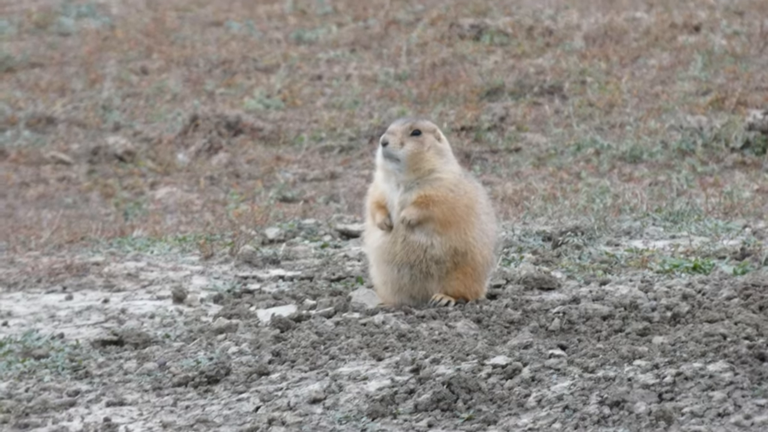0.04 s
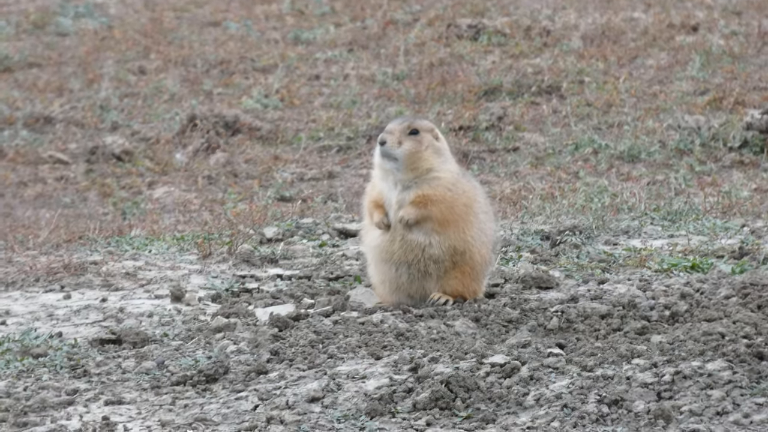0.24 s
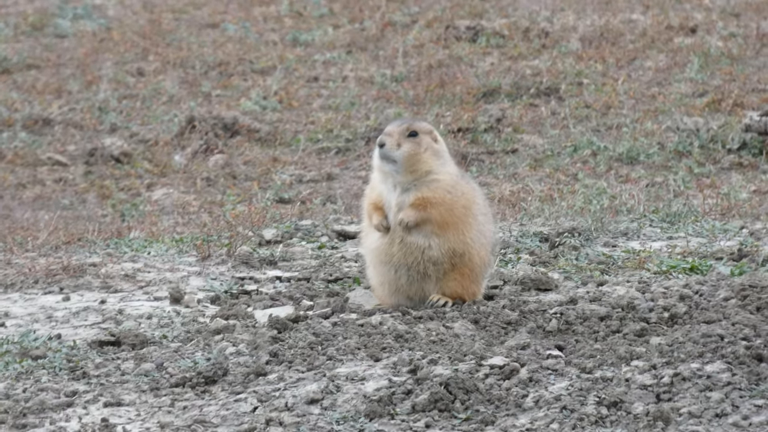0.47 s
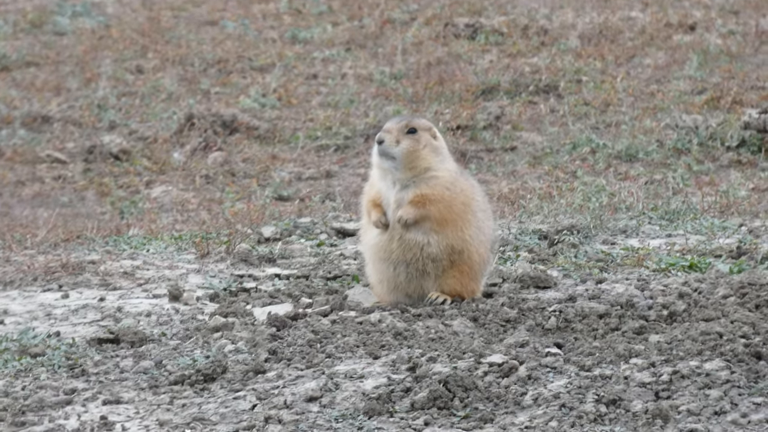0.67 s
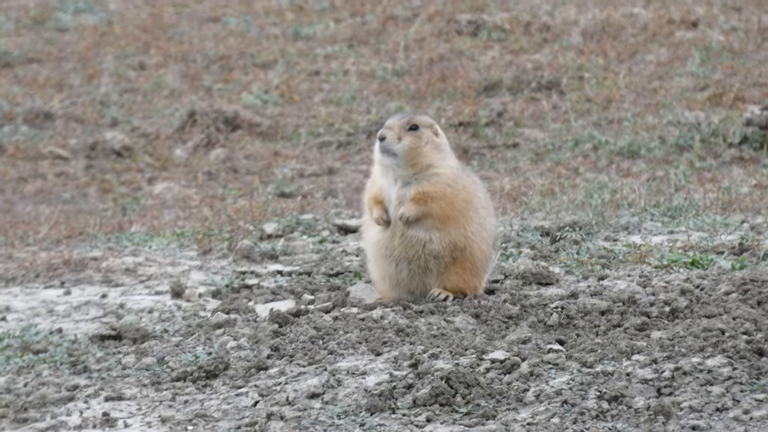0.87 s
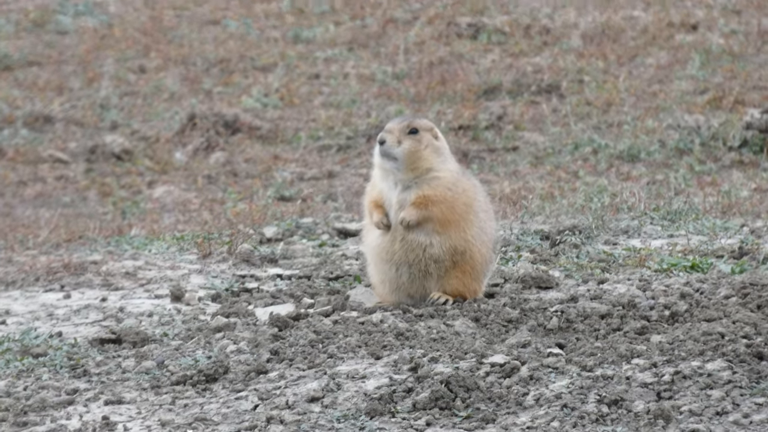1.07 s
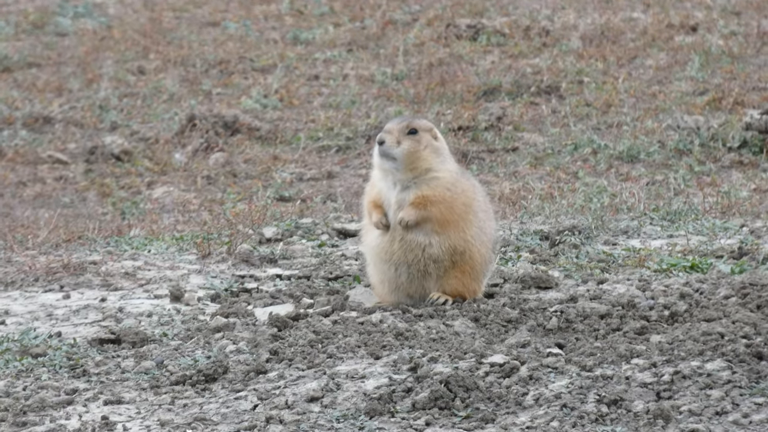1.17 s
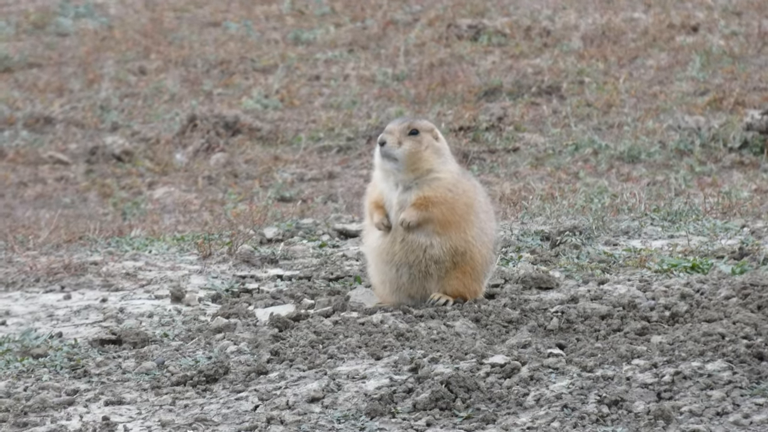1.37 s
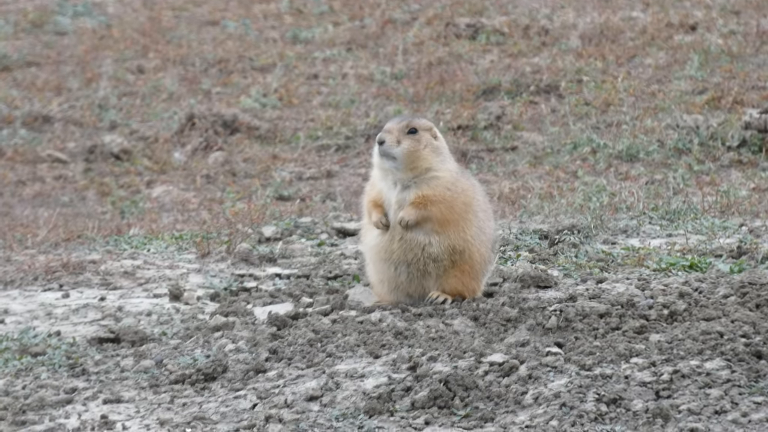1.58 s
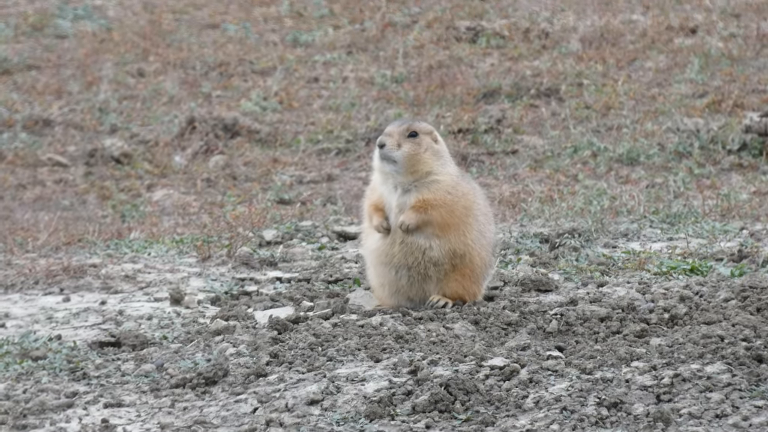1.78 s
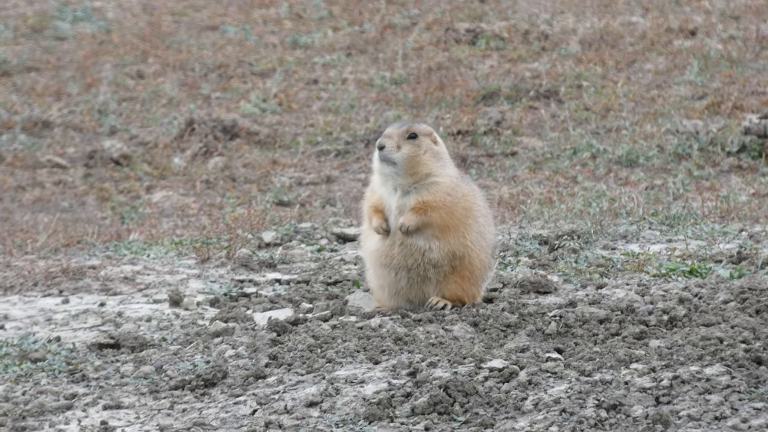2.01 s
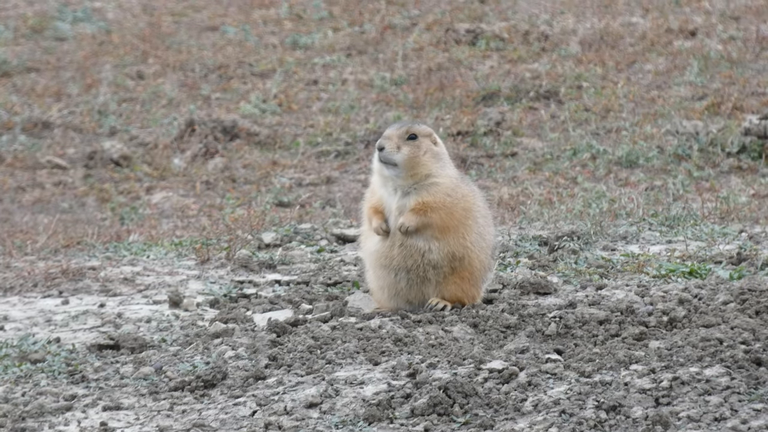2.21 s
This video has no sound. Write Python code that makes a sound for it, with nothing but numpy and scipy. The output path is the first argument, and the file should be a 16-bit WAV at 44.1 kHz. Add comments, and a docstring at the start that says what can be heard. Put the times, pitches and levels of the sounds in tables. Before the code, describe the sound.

A prairie dog gives three short, shrill, raspy barks nearby while wind rumbles on the microphone

```python
"""Open grassland, with gusts rumbling and flapping on the microphone throughout over faint still air.
A prairie dog nearby, a little to the left, gives three short, shrill barks; a faint dry tick follows
the first. Others bark faintly from far off, one before each of the later barks and one after the last.
The barks are sums of harmonics on an arching pitch, buzzing, then clearing as it falls, with rasp noise;
the wind is shaped noise under gust levels, with quick eddies and sharp buffets."""
import sys
import numpy as np
from scipy import signal
from scipy.fft import rfft, irfft
from scipy.io import wavfile

SR = 44100
rng = np.random.default_rng(int(sys.argv[2]) if len(sys.argv) > 2 else 0)


def wrap_up_sound(samples):
    """Save the sound to the file named by the first command line argument, as 16-bit audio."""
    columns = np.atleast_2d(samples).T
    # keep every value between -1 and 1, then stretch to whole-number steps
    tamed = np.clip(columns, -1, 1)
    steps = np.round(tamed * 32767).astype(np.int16)
    wavfile.write(sys.argv[1], SR, steps)


N = 99225
T = np.arange(N) / SR

# strength of each harmonic at the vocal folds, fundamental first: strength_db [dB]
FOLD_HARMONICS = [2, 6.5, -4, -12, -19, -31, -41.5]


def amp(db):
    """Decibels to gain."""
    return 10 ** (np.asarray(db) / 20)


def evened(x):
    """Scales to unit power."""
    return x / np.sqrt(np.mean(x ** 2) + 1e-20)


def colour(x, points):
    """Filters by a (Hz, dB) curve, joined on a logarithmic frequency scale."""
    size = x.shape[-1]
    hz, db = np.transpose(points)
    f = np.fft.rfftfreq(size, 1 / SR)
    gain = amp(np.interp(np.log(f + 1), np.log(hz), db))
    return irfft(rfft(x) * gain, size)


def wander(size, rate_hz):
    """Smooth random drift, of unit power over the whole scene, fading out above about a rate."""
    f = np.fft.rfftfreq(N, 1 / SR)
    slowed = rfft(rng.standard_normal(N)) * np.exp(-(f / rate_hz) ** 2)
    return evened(irfft(slowed, N))[:size]


def add(mix, start_s, sound):
    """Mixes a sound in at a time."""
    part = mix[max(round(start_s * SR), 0):][:len(sound)]
    part += sound[:len(part)]


def burst(centre_s, level_db, half_s):
    """A short bell-shaped swell; half_s is its standard deviation."""
    return amp(level_db) * np.exp(-.5 * ((T - centre_s) / half_s) ** 2)


def turbulence(spectrum):
    """Wind noise for the two channels: mostly shared in the bass, more opposed in the middle range."""
    # left-right difference against the sum: frequency_hz [Hz], difference_db [dB]
    width = [(30, -7.5), (90, -9.5), (180, -6.5), (350, -2.5), (700, 5), (1400, 6), (2500, 4), (4000, -2),
             (12000, -5)]
    # left channel over right, a lean to the left where positive: frequency_hz [Hz], lean_db [dB]
    lean = [(60, -.3), (170, .5), (350, 1.8), (700, 1.2), (3000, 1)]
    mid, side = evened(colour(rng.standard_normal((2, N)), spectrum))
    side = colour(side, width)
    left = colour(mid + side, [(hz, db / 2) for hz, db in lean])
    right = colour(mid - side, [(hz, -db / 2) for hz, db in lean])
    return np.array([left, right])


def wind():
    """Gusts drive a deep thrum, a rumble and a brighter flapping, broken up by eddies and buffets."""
    # gust levels before the trims below: time_s [s], thrum_db [dB], rumble_db [dB], flap_db [dB]
    gusts = [(0.006, -31.5, -45, -45), (0.03, -54, -42.5, -65), (0.055, -29.5, -28.5, -47.5),
             (0.114, -35, -37, -54.5), (0.186, -37.5, -36.5, -57), (0.233, -21, -25.5, -50),
             (0.276, -35.5, -24, -45), (0.357, -28, -21, -34), (0.474, -40.5, -33.5, -48.5),
             (0.508, -37, -26.5, -44), (0.616, -30, -28, -44), (0.631, -43.5, -45.5, -70),
             (0.647, -19, -33.5, -38.5), (0.66, -33.5, -35.5, -58), (0.729, -24, -21.5, -23.5),
             (0.773, -25, -36.5, -41), (0.791, -49, -26, -39), (0.812, -37, -44, -63.5),
             (0.833, -29.5, -30.5, -41), (0.844, -44, -33, -53), (0.955, -32.5, -30.5, -48),
             (0.985, -35, -23, -35.5), (1.002, -33.5, -27.5, -45), (1.027, -51, -11.5, -36),
             (1.043, -29, -29.5, -34.5), (1.061, -21, -19, -21), (1.086, -38.5, -33, -36.5),
             (1.114, -26.5, -25, -44), (1.13, -55, -31.5, -51.5), (1.161, -37, -22, -28.5),
             (1.223, -43.5, -41.5, -59.0), (1.252, -26.5, -27.5, -42), (1.299, -36, -33.5, -45.5),
             (1.319, -25, -23, -28.5), (1.407, -51.5, -17.5, -30.5), (1.412, -55, -34, -40),
             (1.454, -43, -27.5, -52.5), (1.464, -35, -16.5, -33.5), (1.486, -36.5, -34, -48),
             (1.52, -27, -17.5, -37.5), (1.571, -40, -40, -54.5), (1.588, -43, -32.5, -49),
             (1.673, -37.5, -34.5, -55), (1.744, -57.5, -65, -75), (1.768, -36.5, -41.5, -84),
             (1.81, -40, -49, -57.5), (1.856, -33.5, -25.5, -31.5), (1.884, -27, -18.5, -27.5),
             (1.9, -37, -31.5, -32), (1.918, -31, -19, -27), (1.996, -31.5, -27.5, -39.5),
             (2.008, -42, -34.5, -60), (2.07, -49, -47, -63), (2.16, -38, -40.5, -58),
             (2.179, -55, -59, -67), (2.213, -33.5, -41.5, -52), (2.234, -40, -36.5, -58)]
    # relative noise spectra of the three layers: frequency_hz [Hz], density_db [dB per Hz]
    thrum_spectrum = [(20, -42.5), (35, -30.5), (50, -11.5), (75, 0), (115, 5), (150, 5), (220, -31.5),
                      (500, -71.5)]
    rumble_spectrum = [(30, -38.5), (100, -24), (150, 0), (230, 4.5), (320, -1.5), (450, -9), (650, -21.5),
                       (1000, -37.5), (3000, -90.5)]
    flap_spectrum = [(100, -13.5), (300, 11), (600, 4), (900, -6), (1300, -13.5), (2000, -25), (3000, -37),
                     (5000, -44.5), (9000, -62.5), (15000, -73)]
    # sharp buffets: centre_s [s], level_db [dB], half_s [s, half length of the swell]
    buffets = [(0.156, -47, .0008), (0.231, -43.5, 0.00067), (0.299, -36, 0.0039), (0.328, -48, 0.0015),
               (.358, -33, 0.0018), (0.371, -28, 0.0031), (.401, -32.5, 0.0045), (0.528, -42.5, 0.0027),
               (0.575, -46, .0018), (.605, -44, 0.002), (0.736, -24.5, 0.002), (.79, -41.5, 0.0024),
               (0.841, -52.5, 0.0025), (1.023, -35, 0.0025), (1.0627, -24.5, 0.00018),
               (1.161, -33, 0.00046), (1.247, -37, .0015), (1.339, -38, 0.0018), (1.385, -26.5, 0.002),
               (1.397, -32, 0.0017), (1.465, -42, 0.0014), (1.509, -37, 0.0045), (1.852, -26, 0.0011),
               (1.865, -25.5, 0.0015), (1.927, -25, 0.0024), (1.979, -31.5, .0009)]
    thrum_trim_db, rumble_trim_db, flap_trim_db = -2, -3.5, -0.5
    eddy_rate_hz, rumble_eddy_db, flap_eddy_db = 101, 2, 5.5

    gust_s, *levels = np.transpose(gusts)
    thrum_db, rumble_db, flap_db = (np.interp(T, gust_s, db) for db in levels)
    eddies = 2 * np.tanh(wander(N, eddy_rate_hz) / 2)  # extremes rounded off
    rumble_eddies = evened(amp(rumble_eddy_db * eddies))
    flap_eddies = evened(amp(flap_eddy_db * eddies))
    out = turbulence(thrum_spectrum) * amp(thrum_db + thrum_trim_db)
    out += turbulence(rumble_spectrum) * amp(rumble_db + rumble_trim_db) * rumble_eddies
    out += turbulence(flap_spectrum) * amp(flap_db + flap_trim_db) * flap_eddies
    return out + sum(buffet(*row) for row in buffets)


def buffet(centre_s, level_db, half_s, plain_s=.0018, crack_db=5):
    """One eddy slaps the ports: a thump, or a brighter crack when it is very short."""
    # relative noise spectrum of a slap: frequency_hz [Hz], density_db [dB per Hz]
    slap_spectrum = [(100, 2), (400, 13.5), (1100, 17), (2200, -0.5), (3200, -13), (5500, -35),
                     (15000, -55.5)]
    swell = burst(centre_s, level_db, half_s)
    # each halving below plain_s lifts the treble by crack_db; longer ones are duller
    treble_db = crack_db * np.log2(plain_s / half_s)
    slap = colour(turbulence(slap_spectrum) * swell, [(900, 0.017), (3000, treble_db)])
    return evened(slap) * np.sqrt(np.mean(swell ** 2))


def still_air(level_db=-73):
    """Steady faint hiss over the grass: noise half shared by the channels, half separate."""
    # relative spectrum of the air: frequency_hz [Hz], density_db [dB per Hz]
    air_spectrum = [(100, 10), (1000, 3.5), (2000, -1), (4000, -6), (7000, -13.5), (10000, -15),
                    (15000, -19.5)]
    air = evened(colour(rng.standard_normal((3, N)), air_spectrum))
    return amp(level_db) * (air[:2] + air[2]) / np.sqrt(2)


def gesture(length_s, top_hz, crest, scoop, sag):
    """Time, pitch arch and loudness of one bark: pitch climbs to a crest, then sags."""
    attack_s, release_s, swell_db = .007, .007, 1
    t = np.arange(0, length_s, 1 / SR)
    u = t / length_s
    rise = np.maximum(1 - u / crest, 0)
    fall = np.maximum(u - crest, 0) / (1 - crest)
    hz = top_hz * (1 - scoop * rise ** 1.9 - sag * fall ** 1.15)
    edges = np.minimum(t / attack_s, 1) * np.minimum((length_s - t) / release_s, 1)
    return t, hz, edges * amp(swell_db * (u - 2.5))


def bark(start_s, length_s, top_hz, level_db, crest, scoop, sag, flutter, rasp_db, overtones_db, grit,
         *changes):
    """Folds vibrate with a fast flutter and rasp, settle into a clearer falling tone, fray at the end."""
    # colour of the throat and mouth: frequency_hz [Hz], gain_db [dB]
    throat = [(1000, -38.5), (1800, -5.5), (2600, 2.5), (3300, 1), (3780, 4), (4300, -8), (5100, 4.5),
              (6000, -12.5), (6800, 8.5), (7500, -9.5), (10200, -0.5), (11200, -5.5), (13000, 1.5),
              (15000, -16.5)]
    # relative spectrum of the breathy rasp: frequency_hz [Hz], density_db [dB per Hz]
    rasp_spectrum = [(600, -41), (2000, -23), (2700, -9.5), (3700, 4), (4400, -2), (5300, 3.5), (6100, -8),
                     (7700, -10.5), (8500, -15), (9500, -6.5), (10800, -27), (13000, -35), (14000, -54.5)]
    # a second vibration of the folds: rate, pitch swing and unsteadiness of the rate (shares)
    flutter_hz, flutter_swing, flutter_wander = 335, .055, .1
    # time scale of a change [s], roughness left once clear (share), loudness change on fraying [dB]
    change_s, clear_left, fray_db = .002, .3, -7
    jitter, shimmer_db = .005, 1.34  # unsteadiness of pitch (share) and of loudness

    t, hz, loud = gesture(length_s, top_hz, crest, scoop, sag)
    size = len(t)
    broken, cleared, frayed = (.5 + .5 * np.tanh((t - share * length_s) / change_s) for share in changes)
    loud = loud * amp(fray_db * frayed)
    rough = clear_left + (1 - clear_left) * (broken - cleared + frayed)

    beat_hz = flutter_hz * (1 + flutter_wander * wander(size, 87))
    beat = np.cos(2 * np.pi * np.cumsum(beat_hz) / SR)
    unsteady = jitter * wander(size, 300) + grit * rough * wander(size, 1200)
    hz = hz * (1 + unsteady + flutter_swing * flutter * rough * beat)
    phase = 2 * np.pi * np.cumsum(hz) / SR

    # overtones_db lifts the third harmonic and all above
    folds = evened(sum(amp(db + overtones_db * (k > 1)) * np.cos((k + 1) * phase)
                       for k, db in enumerate(FOLD_HARMONICS)))
    shimmer = amp(shimmer_db * wander(size, 320))
    voice = colour(loud * folds * (1 + flutter * rough * beat) * shimmer, throat)
    breath = evened(colour(rng.standard_normal(N), rasp_spectrum))[:size]
    rasp = breath * amp(rasp_db) * np.sqrt(abs(rough)) * loud
    return start_s, amp(level_db) * (voice + rasp)


def ground(x):
    """A brief, faint scatter off the earth, different in each channel: decaying noise as an echo."""
    level_db, decay_s = -19, .07  # decay_s is the time to fall 60 dB
    t = T[:SR // 2]
    tail = rng.standard_normal((2, len(t))) * amp(-60 * t / decay_s) * np.minimum(t / 0.0013, 1)
    tail = tail / np.linalg.norm(tail[0])
    return amp(level_db) * signal.fftconvolve(x[None], tail, axes=1)[:, :N]


def tick():
    """A faint dry tick just after the first bark: a very short swell of coloured noise."""
    # the tick before the voice trim: centre_s [s], level_db [dB], half_s [s, half length]
    swell = (.737, -55, .0017)
    # colour of the tick: frequency_hz [Hz], gain_db [dB]
    tick_colour = [(1500, -16), (3500, 1), (7000, -3.5), (9500, -11.5), (11000, -15), (15000, -20)]
    return burst(*swell) * evened(colour(rng.standard_normal(N), tick_colour))


def far_bark(start_s, length_s, top_hz, level_db):
    """A pitch arch of the same kind from a far neighbour: equal harmonics, coloured by distance."""
    # colour of a distant bark: frequency_hz [Hz], gain_db [dB]
    far_colour = [(1400, -12), (2750, -7), (4100, 0), (5500, -12), (6900, -9), (8300, -26), (11000, -40)]
    t, hz, loud = gesture(length_s, top_hz, crest=.33, scoop=.06, sag=.125)
    hz = hz * (1 + .03 * wander(len(t), 700))
    phase = 2 * np.pi * np.cumsum(hz) / SR
    folds = sum(np.cos((k + 1) * phase) for k in range(len(FOLD_HARMONICS)))
    return start_s, amp(level_db) * evened(colour(loud * folds, far_colour))


def scene(voice_db=-2.5, lean_db=1.5):
    """The animals and the tick, a little to the left, under wind and still air."""
    # near barks before the voice trim: start_s [s], length_s [s], top_hz [Hz], level_db [dB],
    # crest [place of the pitch crest, 0-1], scoop [pitch share], sag [pitch share], flutter [depth 0-1],
    # rasp_db [dB], overtones_db [dB], grit [pitch share],
    # then turns_rough, clears, frays [shares of the length; below 0 is rough from the start]
    near_barks = [(.656, .071, 1905, -31.8, .34, .17, .19, .25, -13, 0, .029, .15, .56, .92),
                  (1.319, .067, 1752, -41, .44, .075, .11, .7, -18, 1, .02, -.1, .55, .84),
                  (1.866, .064, 1724, -38, .5, .04, .13, .8, -17, 2, .022, -.1, .55, .8)]
    # far neighbours before the voice trim: start_s [s], length_s [s], top_hz [Hz], level_db [dB]
    far_barks = [(1.185, .064, 1385, -67), (1.745, .045, 1430, -79), (2.16, .05, 1400, -81)]
    calls = tick()
    for row in near_barks:
        add(calls, *bark(*row))
    for row in far_barks:
        add(calls, *far_bark(*row))
    direct = calls * amp([[lean_db], [-lean_db]])
    animals = direct + ground(calls)
    return amp(voice_db) * animals + wind() + still_air()


def record(dry):
    """A few milliseconds of fade-in, and a low-pass that removes the highest treble."""
    edge_hz = 15650
    started = dry * np.minimum(T / .008, 1)
    low_pass = signal.firwin(511, edge_hz, window=("kaiser", 9), fs=SR)
    return signal.oaconvolve(started, low_pass[None], "same")


dry = scene()
out = record(dry)
wrap_up_sound(out)
```